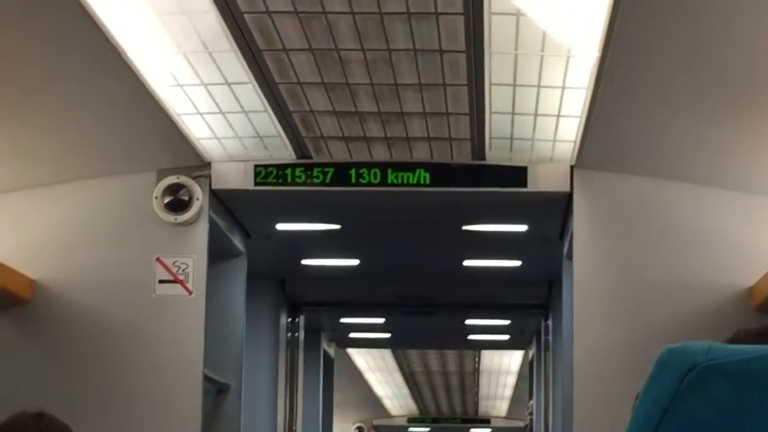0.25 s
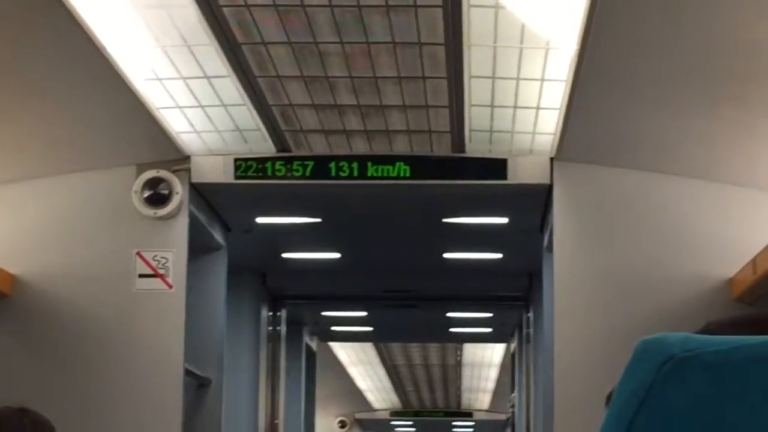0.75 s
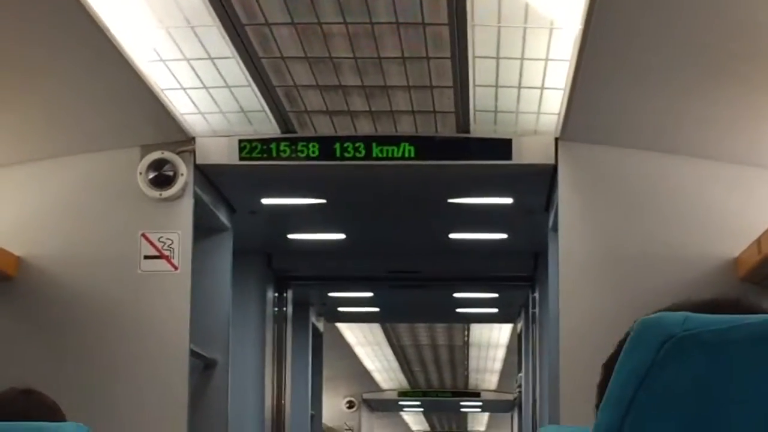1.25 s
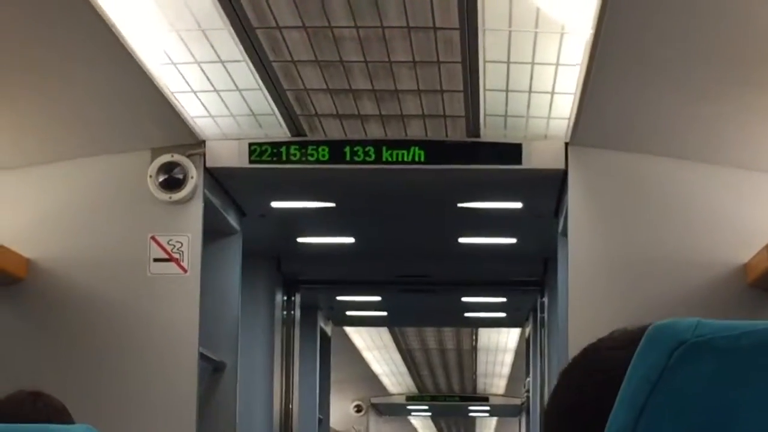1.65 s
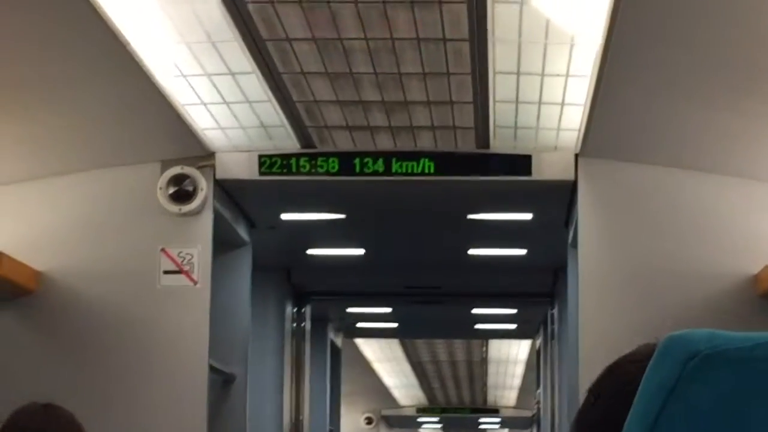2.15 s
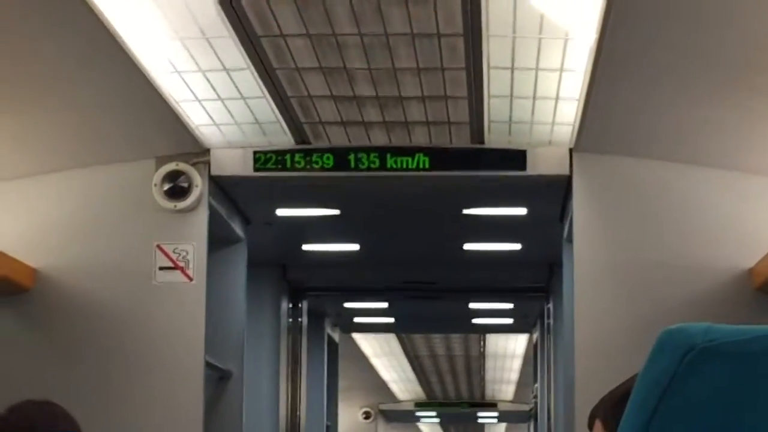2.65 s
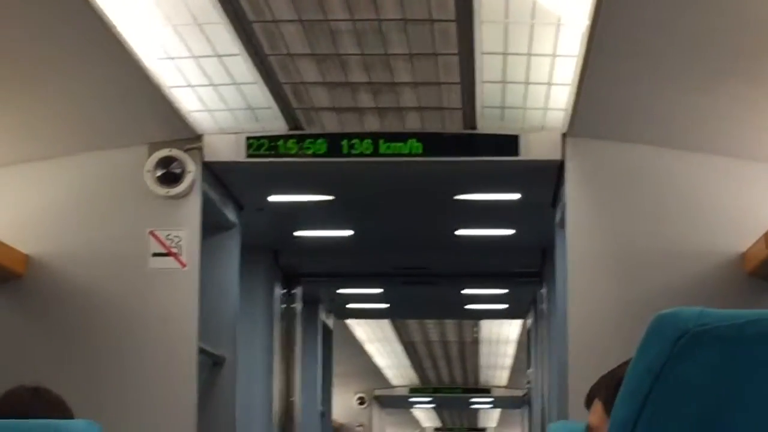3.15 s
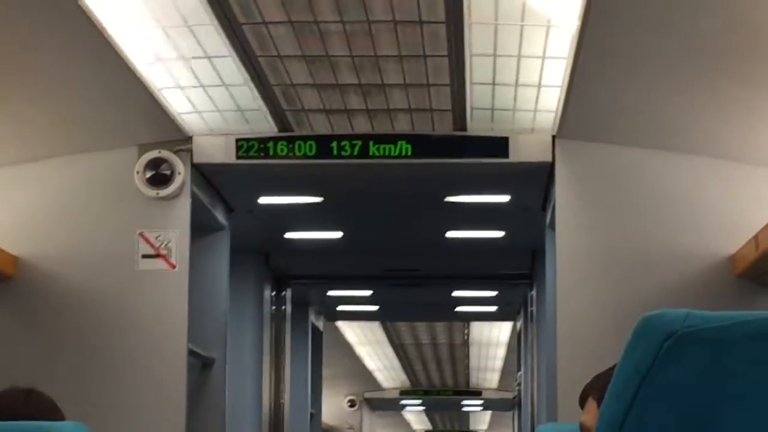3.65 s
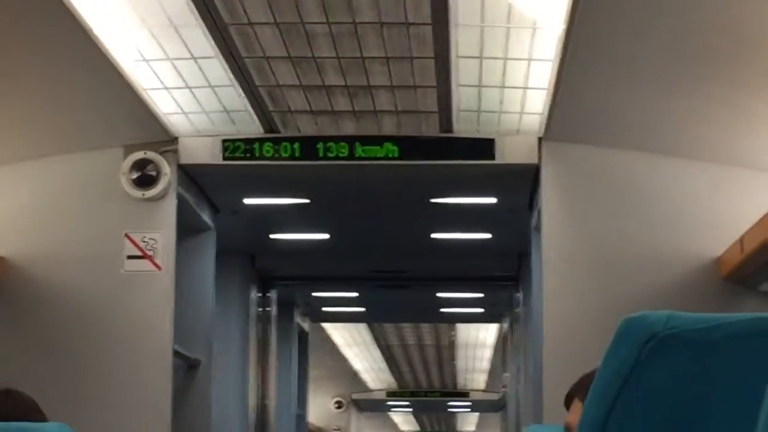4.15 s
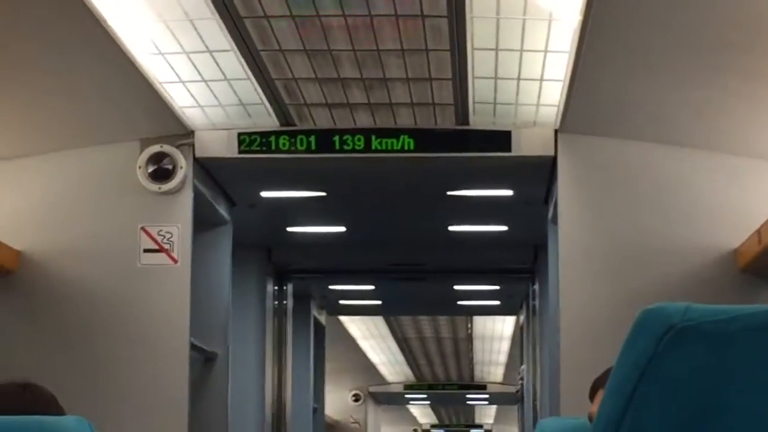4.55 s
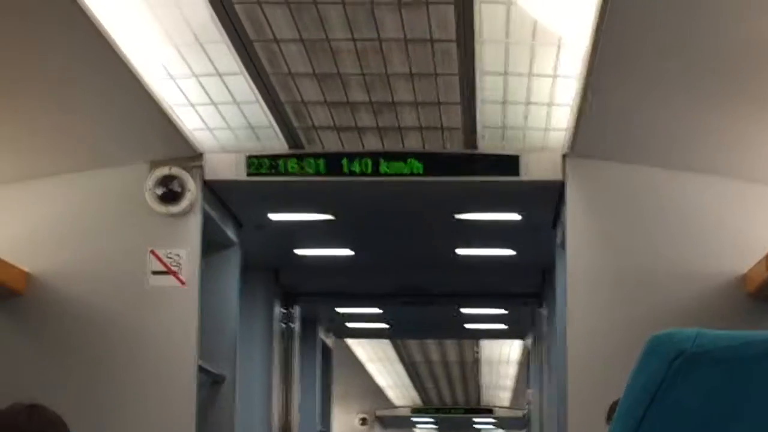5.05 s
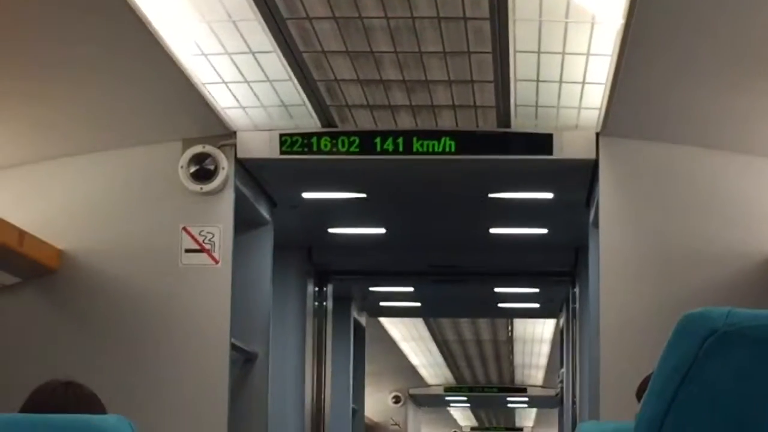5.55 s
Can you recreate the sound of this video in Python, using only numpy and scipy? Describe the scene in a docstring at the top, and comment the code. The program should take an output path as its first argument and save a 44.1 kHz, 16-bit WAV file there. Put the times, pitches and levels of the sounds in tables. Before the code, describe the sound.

A train's deep rolling rumble and soft motor hum fill the carriage, with faint rustles and two short hisses close by.

```python
"""Wheels rumble through the floor of a fast electric train, heard inside as it gently gains speed.
Rough rails and uneven wheels shake the car, and the motors sing a hum that rises as they turn faster.
A fan drones, the vents blow, and loose panels buzz. Close by come a fading wisp of hiss, two brief
hisses, small rustles and ticks, the light clack of a fitting, and a few faint, thin squeaks."""
import sys
import numpy as np
from scipy import signal
from scipy.fft import rfft, irfft
from scipy.io import wavfile

SR = 44100
rng = np.random.default_rng(int(sys.argv[2]) if len(sys.argv) > 2 else 0)


def unload_audio(sound):
    """Save the sound as a 16-bit wav file, at the path given as the first command line argument."""
    columns = np.transpose(np.atleast_2d(sound))
    # keep every value between -1 and 1, then stretch to whole-number steps
    steps = np.round(np.clip(columns, -1, 1) * 32767)
    wavfile.write(sys.argv[1], SR, steps.astype(np.int16))


N = 255901
T = np.arange(N) / SR


# The deep rumble of rolling. Each row: pitch in Hz, relative strength in dB.
RUMBLE_COLOUR = [(20, -22.5), (28, -19), (42, -1.5), (70, 2), (105, 2), (145, -1), (175, -5.5), (230, -9),
                 (300, -14), (390, -16), (500, -19), (630, -17), (700, -39.5), (1000, -59.5)]
# The higher roar of rolling. Each row: pitch in Hz, relative strength in dB.
ROAR_COLOUR = [(400, -3), (650, 5), (800, 5.5), (950, 1), (1100, -5), (1400, -14), (1700, -25.5),
               (2200, -28.5), (3000, -33.5), (4200, -38.5), (8000, -59)]
# Body panels rung by the rails. Each row: pitch in Hz, width in Hz, level in dB.
BODY_PANELS = [(433.7, 39, -53.5), (548, 57, -49.5), (613.5, 20, -56), (866.5, 76, -60.5)]
# How rough the track is. Each row: time in seconds, boost to rumble and panels in dB.
TRACK_ROUGHNESS = [(0, -0.5), (1, -1), (2.7, -1), (3.7, 0.5), (4.7, -0.6), (5.8, -2)]

def rolling_wheels(wheel_turns, rumble_db=-29.5, rumble_db_per_s=-0.15, roar_db=-51.5, treads_db=-40):
    """Rough rails shake floor and panels; the uneven wheel treads repeat their bumps on every turn."""
    track_db = curve(TRACK_ROUGHNESS)
    # The faster the rails pass, the higher the rumble.
    rails = np.interp(wheel_turns, np.linspace(0, wheel_turns[-1], N), noise(RUMBLE_COLOUR))
    rumble = from_db(rumble_db + rumble_db_per_s * T + track_db) * rails
    roar = from_db(roar_db + .5 * drift(8.4)) * noise(ROAR_COLOUR)
    panels = sum(from_db(db + track_db + drift(12)) * ringing_noise(hz, width)
                 for hz, width, db in BODY_PANELS)
    bumps_per_turn = np.array([11, 32, 35, 38, 40, 43, 46, 49, 50, 52])
    gains = colour_gain(RUMBLE_COLOUR, bumps_per_turn * wheel_turns[-1] / T[-1])
    treads = sum(gain * tone(bumps * wheel_turns, waver_db=3.5, blur_rad=0.3)
                 for bumps, gain in zip(bumps_per_turn, gains))
    return rumble + roar + panels + from_db(treads_db) * treads


# Swells in the rumble. Each row: peak time in seconds, level in dB, fade time in seconds, pitch in Hz.
RUMBLE_SURGES = [(.03, -28, 0.045, 148), (.55, -30, .025, 91.5), (.75, -33.5, .04, 155),
                 (1.19, -33.5, 0.064, 74.7), (2.01, -36, .025, 101), (3.22, -30.5, 0.043, 122),
                 (3.64, -33, .06, 139)]

def surges():
    """The rumble swells for a moment now and then."""
    return noise_bursts(RUMBLE_SURGES, width_share=0.25, grain_db=2.5, attack_share=0.68)


# How fast the motors spin. Each row: time in seconds, turns per second.
SHAFT_SPEED = [(0, 35.48), (2, 36.54), (4, 37.72), (5.8, 38.8)]

def motor_shaft():
    """The shaft slowly speeds up; gives its speed and the number of turns made so far."""
    speed = curve(SHAFT_SPEED)
    return speed, np.cumsum(speed) / SR


# The motors' leading hum. Each row: time in seconds, level in dB.
HUM_LEVEL = [(0, -40), (.25, -52), (1.1, -50.5), (1.75, -43), (2.3, -47.5), (2.5, -43), (2.85, -44.5),
             (3.4, -52.5), (3.7, -37.5), (4.03, -50), (4.35, -39.5), (4.7, -48.5), (4.93, -38), (5.2, -41),
             (5.52, -37), (5.8, -39.5)]
# The whine an octave above it. Each row: time in seconds, level in dB.
WHINE_LEVEL = [(0, -57), (.75, -63), (.98, -51), (1.5, -63.5), (1.95, -70.5), (2.22, -52.5), (2.5, -64),
               (2.85, -49), (3.3, -53.5), (3.65, -62.5), (4.15, -56), (4.4, -59), (4.75, -52), (5, -56.5),
               (5.2, -48.5), (5.45, -57.5), (5.7, -56)]
# The other motor tones. Each entry: vibrations per turn of the shaft.
TONES_PER_TURN = (3, 4, 5, 6, 7, 9, 10, 11, 14, 17, 22, 30, 36)
# Their strength, in the same order. Each entry: level in dB before swelling.
TONE_LEVELS = [-45, -44.5, -54, -52.5, -53.5, -57, -58.5, -58.5, -60.5, -58.5, -66, -74, -74]
# Pitches at which a rising motor tone swells for a while. Each row: pitch in Hz, width in Hz, boost in dB.
TONE_SWELLS = [(109.2, 1.8, 5.5), (112.7, 1.2, 5), (140.7, 2.9, 9.5), (181.3, 4.1, 14), (221.4, 4.2, 6),
               (330.1, 4.9, 13), (643, 14, 6), (1010, 9.8, 4.5), (1393, 12, 8.5)]

def motors(speed, turns):
    """Motor and gear tones rise with the shaft's speed; some swell and sink as they climb."""
    hum = from_db(curve(HUM_LEVEL)) * rough_tone(12 * turns, roughness=0.28, rate_hz=18)
    whine = from_db(curve(WHINE_LEVEL)) * rough_tone(24 * turns, roughness=.1 + .02 * T ** 2, rate_hz=25)
    out = hum + whine
    for per_turn, db in zip(TONES_PER_TURN, TONE_LEVELS):
        swell = 1 + sum((from_db(boost_db) - 1) / (1 + (2 * (per_turn * speed - hz) / width) ** 2)
                        for hz, width, boost_db in TONE_SWELLS)
        out += from_db(db) * swell * tone(per_turn * turns, waver_db=0.6, blur_rad=0.46)
    return out


# The fan's drone. Each row: time in seconds, level in dB.
FAN_LEVEL = [(0, -52), (1.2, -36.5), (4.2, -40.5), (4.7, -43), (5.8, -46)]
# The rush of air from the vents. Each row: pitch in Hz, relative strength in dB.
AIR_COLOUR = [(1500, 9), (3000, 3), (4400, -3.5), (5200, -4), (6500, -3), (7400, -7.5), (9500, -7.5),
              (10400, -13.5), (11500, -9), (15000, -14)]
# How loud that air is. Each row: time in seconds, level in dB.
AIR_LEVEL = [(0, -71), (4, -70.5), (5.1, -68.5), (5.8, -69.5)]

def ventilation(fan_hz=48.3):
    """A fan drones at one pitch under a soft rush of air."""
    drone = from_db(curve(FAN_LEVEL)) * tone(fan_hz * T, waver_db=2.5, blur_rad=0.9)
    return drone + from_db(curve(AIR_LEVEL)) * noise(AIR_COLOUR)


# The noise all hisses share. Each row: pitch in Hz, relative strength in dB.
HISS_COLOUR = [(1000, -8.5), (1400, -4.5), (1900, -3), (2700, -3.5), (3500, -1.5), (4400, -4), (5100, -7.5),
               (6500, -7), (7100, -9.5), (8200, -14), (10000, -21.5), (12000, -20.5), (15000, -27)]
# Ringing in that noise. Each row: pitch in Hz, width in Hz, relative strength in dB.
HISS_RESONANCES = [(1776, 140, -8.5), (2185, 180, -9), (3550, 300, -17), (4130, 330, -14), (5780, 540, -15),
                   (6440, 340, -17)]
# Each row is one hiss: peak time in seconds, level in dB, rise and fall times in seconds,
# low edge in Hz, level of its airy sheen in dB, its own pitch in Hz, level of that pitch in dB.
HISS_EVENTS = [(0.029, -66, 0.048, 0.085, 2200, -73.5, 5770, -70),
               (4.224, -53.5, 0.055, 0.058, 1750, -65, 2390, -56),
               (4.851, -38.5, 0.014, 0.026, 1050, -70, 3380, -50)]

def hisses():
    """Each hiss swells and sinks with its own pitch and an airy sheen; the softer ones are thinner."""
    body = noise(HISS_COLOUR) + ring_together(HISS_RESONANCES)
    sheen = ringing_noise(9000, 7000)
    out = 0
    for peak_s, db, rise, fall, low_hz, sheen_db, own_hz, own_db in HISS_EVENTS:
        swell = np.exp(-.5 * ((T - peak_s) / np.where(T < peak_s, rise, fall)) ** 2)
        thinned = rms_one(signal.sosfilt(signal.butter(2, low_hz, "high", fs=SR, output="sos"), body))
        own = ringing_noise(own_hz, .25 * own_hz)
        out += swell * (from_db(db) * thinned + from_db(sheen_db) * sheen + from_db(own_db) * own)
    return out * from_db(0.69 * drift(60))


# The ways a small fitting rings. Each row: pitch in Hz, width in Hz, relative strength in dB.
FITTING_RESONANCES = [(1340, 350, 1), (1950, 370, -4), (2540, 450, -5.5), (3300, 400, -6),
                      (4200, 660, -10.5), (6100, 1700, -12.5), (9200, 900, -22), (13500, 6000, -19)]

def clack(peak_s=2.301, fade_s=0.011, level_db=-55):
    """A light fitting chatters for an instant, ringing at all its pitches."""
    envelope = burst(T - peak_s, fade_s, attack_share=0.105)
    return from_db(level_db) * envelope * ring_together(FITTING_RESONANCES)


# Each row is one rustle: peak time in seconds, level in dB, fade time in seconds, pitch in Hz.
RUSTLE_EVENTS = [(.558, -67.5, 0.014, 6400), (.574, -58, 0.027, 1740), (.582, -68, 0.017, 4000),
                 (.893, -65, 0.022, 1900), (1.14, -67.5, 0.023, 2000), (1.645, -65, 0.017, 2380),
                 (1.862, -66, 0.013, 2320), (2.170, -65, 0.011, 3250), (2.506, -63, 0.021, 2180),
                 (2.618, -72, .012, 3600), (2.812, -72.5, 0.021, 2970), (4.063, -59, 0.024, 2100),
                 (4.725, -74, 0.024, 3260), (4.812, -57, .01, 3000), (5.05, -64.5, 0.028, 2160),
                 (5.15, -67, 0.0071, 2410), (5.355, -68, .02, 2480), (5.49, -62.5, 0.0083, 2140)]

def rustles():
    """Light rubbing makes short, soft bursts of noise."""
    return noise_bursts(RUSTLE_EVENTS, width_share=0.6, grain_db=1.5, attack_share=0.21)


# Each row is one tick: peak time in seconds, level in dB, fade time in seconds, pitch in Hz.
TICK_EVENTS = [(.543, -57, 0.0023, 6300), (.555, -64, 0.0037, 6300), (2.278, -68, 0.0049, 12400),
               (2.608, -74, 0.0067, 6700), (2.9135, -60, .002, 8000), (5.258, -70, 0.0011, 11100),
               (5.3105, -58, .001, 12800)]

def ticks():
    """The briefest rubs are heard as sharp, high ticks."""
    return noise_bursts(TICK_EVENTS, width_share=0.6, grain_db=4.5, attack_share=0.12)


# Loose ceiling and wall panels. Each row: pitch in Hz, width in Hz, level in dB.
TRIM_PANELS = [(1053, 290, -68), (1333, 240, -69.5), (1601, 220, -74), (1932, 410, -74), (2520, 330, -84),
               (3400, 1800, -88)]
# How hard they are shaken. Each row: time in seconds, boost in dB.
TRIM_SHAKING = [(0, -3.5), (1.2, 1.5), (3.5, -3), (5.3, 3), (5.8, 0.5)]

def loose_trim(unrest_db=5.0):
    """Light panels buzz in short fits as the car shakes, partly together and partly each on its own."""
    shared_shake = drift(10)
    out = 0
    for hz, width, db in TRIM_PANELS:
        fits = 2 * np.tanh((.5 * shared_shake + drift(9.1)) / 2)
        out += from_db(db + unrest_db * fits) * ringing_noise(hz, width)
    return out * from_db(curve(TRIM_SHAKING))


# Each row is one squeak: middle time in seconds, level in dB, length in seconds.
SQUEAK_EVENTS = [(4.045, -78, .02), (4.095, -75, .04), (4.735, -84, .05), (5.133, -80, .03),
                 (5.397, -83, .02), (5.48, -71.5, .14)]

def squeaks(start_hz=11100, arch_hz_per_s=3300, rasp_hz=110, jitter_share=.55, grain_db=4.5):
    """Each raspy squeak rises and falls in pitch and strength, and is most ragged at the top."""
    level, rise_hz = np.zeros(N), np.zeros(N)
    for middle_s, db, length in SQUEAK_EVENTS:
        arch = np.clip(1 - (2 * (T - middle_s) / length) ** 2, 0, 1)
        level += from_db(db) * arch
        rise_hz += arch_hz_per_s * length * arch   # longer squeaks climb higher
    hz = start_hz + rise_hz + (rasp_hz + jitter_share * rise_hz) * ringing_noise(200, 500)
    whistle = np.sin(2 * np.pi * np.cumsum(hz) / SR)
    return level * rms_one(whistle * from_db(grain_db * drift(120)))


# Echoes off seat back, window and luggage rack. Each row: delay in seconds, relative strength in dB.
NEAR_ECHOES = [(.0022, -16.5), (.0047, -10.5), (.0071, -12.5)]

def cabin(sound, tail_db, tail_s=0.3):
    """Near surfaces throw back quick echoes; the lining of the car adds a short, blurred tail."""
    t = T[:SR // 2]
    tail = rng.standard_normal(len(t)) * from_db(-60 * t / tail_s) * (t > .004)
    tail = signal.sosfilt(signal.butter(1, 5000, fs=SR, output="sos"), tail)   # seats soak up treble
    echoes = from_db(tail_db) * tail / np.linalg.norm(tail)
    for delay, db in NEAR_ECHOES:
        echoes[round(delay * SR)] += from_db(db)
    return sound + signal.fftconvolve(sound, echoes)[:N]


def from_db(db):
    """Turn decibels into a number to multiply by."""
    return 10 ** (np.asarray(db) / 20)


def rms_one(x):
    """Scale a signal to an average power of 1."""
    return x / np.sqrt(np.mean(x ** 2) + 1e-20)


def curve(rows):
    """Join (time, value) points with straight lines."""
    return np.interp(T, *np.transpose(rows))


def drift(rate_hz):
    """A smooth random wander, about 1 in size; a higher rate wanders faster."""
    step, warm_up = 100, 2000
    r = np.exp(-2 * np.pi * step * rate_hz / SR)
    chance = rng.standard_normal(N // step + warm_up + 2)
    slow = signal.lfilter([1], [1, -2 * r, r * r], chance)[warm_up:]
    return np.interp(np.arange(N) / step, np.arange(len(slow)), rms_one(slow))


def colour_gain(colour, hz):
    """Look up how strong a pitch is in a colour table."""
    pitches, db = np.transpose(colour)
    return from_db(np.interp(np.log(hz + 1e-3), np.log(pitches), db))


def noise(colour):
    """Noise shaped by a colour table, dying away beyond both its ends."""
    hz = np.arange(N // 2 + 1) * SR / N
    low_hz, high_hz = colour[0][0] / 2, colour[-1][0] * 2
    ends = 1 / np.sqrt((1 + (low_hz / (hz + 1)) ** 6) * (1 + (hz / high_hz) ** 20))
    return rms_one(irfft(rfft(rng.standard_normal(N)) * colour_gain(colour, hz) * ends, N))


def ringing_noise(hz, width_hz, size=N):
    """Noise gathered round one pitch; the smaller the width, the clearer the note."""
    r = np.exp(-np.pi * width_hz / SR)
    resonance = [1, 0, -1, 1, -2 * r * np.cos(2 * np.pi * hz / SR), r * r]
    return rms_one(signal.sosfilt([resonance, resonance], rng.standard_normal(size)))


def ring_together(resonances):
    """Noise ringing at several pitches at once."""
    return sum(from_db(db) * ringing_noise(hz, width) for hz, width, db in resonances)


def tone(cycles, waver_db, blur_rad, flutter_hz=12, db_per_khz=3, rad_per_khz=0.33):
    """A slowly wavering note with a quick flutter that is stronger for higher notes."""
    khz = cycles[-1] / T[-1] / 1000
    phase = 2 * np.pi * (cycles + rng.random())
    phase += blur_rad * drift(2.93) + rad_per_khz * khz * drift(flutter_hz)
    level_db = waver_db * drift(2.5) + db_per_khz * khz * drift(flutter_hz)
    return rms_one(np.sin(phase) * from_db(level_db))


def rough_tone(cycles, roughness, rate_hz):
    """A note shaken at random in strength and timing, so that it sounds rough."""
    phase = 2 * np.pi * (cycles + rng.random())
    shaken = (1 + roughness * drift(rate_hz)) * np.sin(phase)
    return rms_one(shaken + roughness * drift(rate_hz) * np.cos(phase))


def burst(t, fade_s, attack_share):
    """A loudness shape that rises to a rounded peak at t = 0 and dies away."""
    return np.tanh(2 * np.exp(-np.abs(t) / np.where(t < 0, attack_share * fade_s, fade_s)))


def noise_bursts(rows, width_share, grain_db, attack_share):
    """Short grainy bursts of noise, each round its own pitch."""
    out = np.zeros(N)
    for peak_s, db, fade_s, hz in rows:
        near = np.abs(T - peak_s) < 10 * fade_s
        t = T[near] - peak_s
        band = ringing_noise(hz, hz * width_share, size=2 * SR)[-len(t):]
        out[near] += from_db(db) * burst(t, fade_s, attack_share) * band
    return out * rms_one(from_db(grain_db * drift(250)))


def scene(gear_ratio=3):
    """The running train with small sounds near the seat; ticks and clack are closest and echo least."""
    speed, turns = motor_shaft()
    wheels = surges() + rolling_wheels(turns / gear_ratio)
    train = wheels + motors(speed, turns) + ventilation() + loose_trim()
    ticking = ticks()
    nearby = cabin(rustles() + hisses() + squeaks(), tail_db=-13)
    closest = cabin(ticking + clack(), tail_db=-20.5)
    return (train + nearby + closest)[None]


def record(dry, cutoff_hz=15300):
    """The very highest treble is cut off steeply."""
    return signal.sosfilt(signal.ellip(12, .1, 90, cutoff_hz, fs=SR, output="sos"), dry)


dry = scene()
out = record(dry)
unload_audio(out)
```